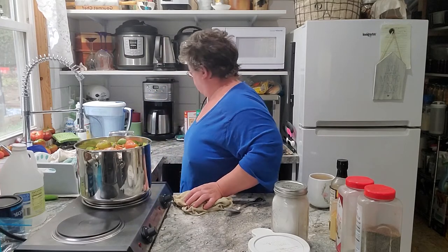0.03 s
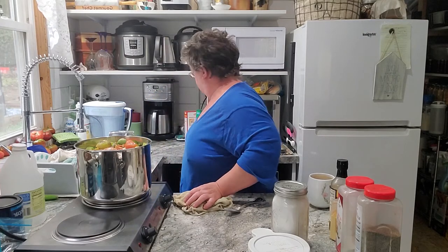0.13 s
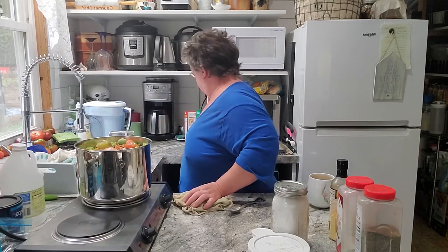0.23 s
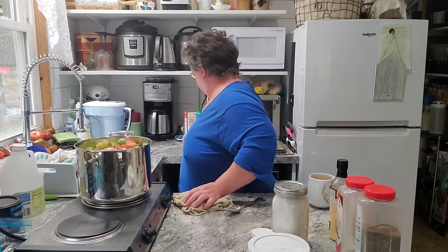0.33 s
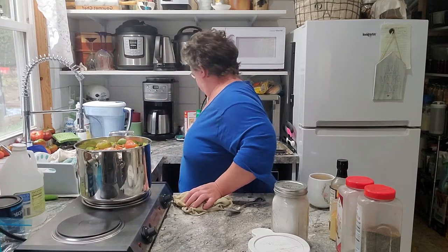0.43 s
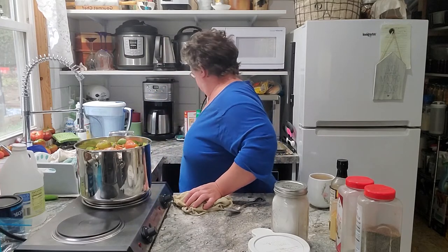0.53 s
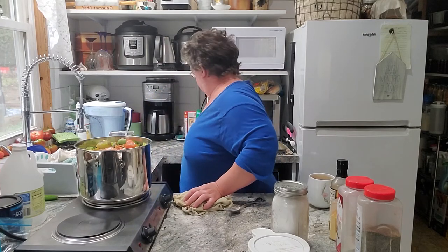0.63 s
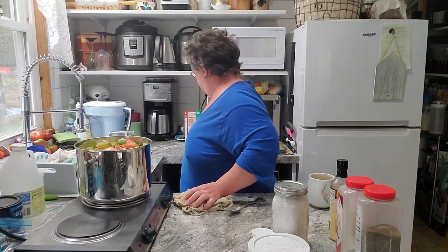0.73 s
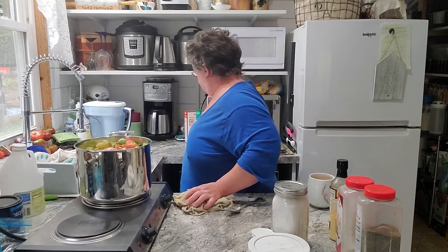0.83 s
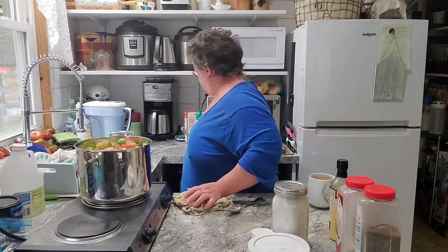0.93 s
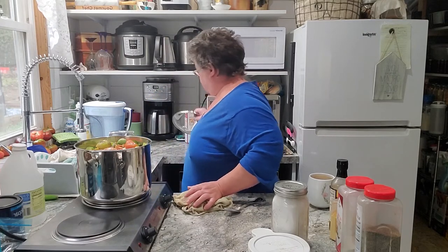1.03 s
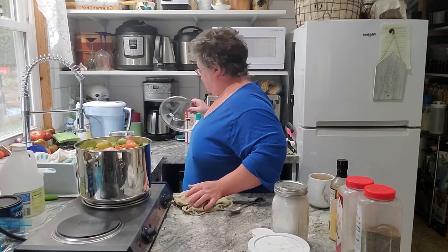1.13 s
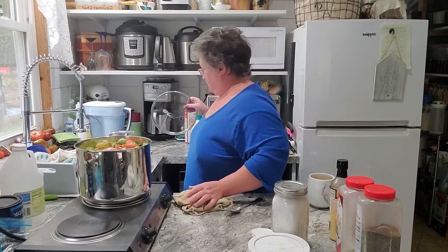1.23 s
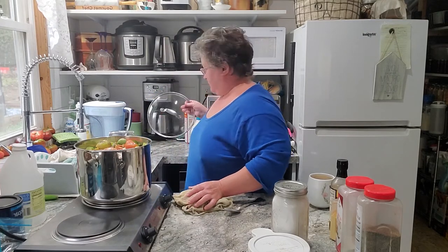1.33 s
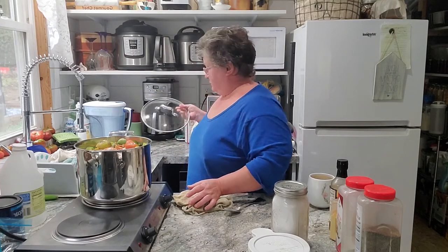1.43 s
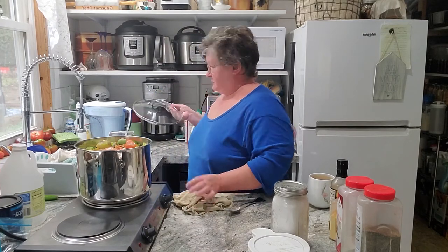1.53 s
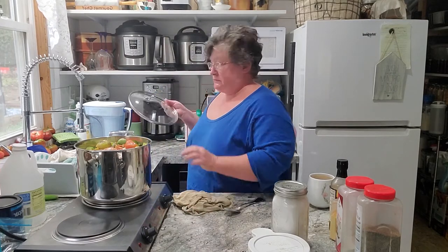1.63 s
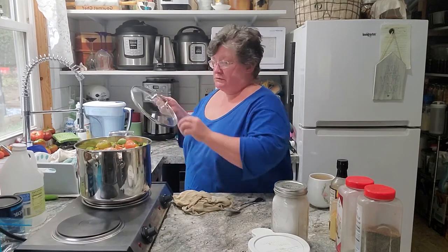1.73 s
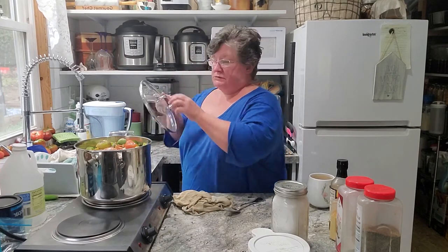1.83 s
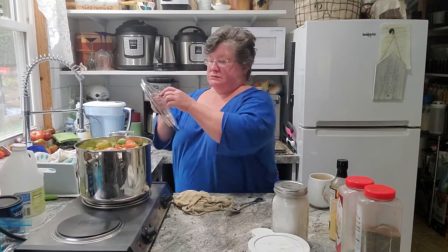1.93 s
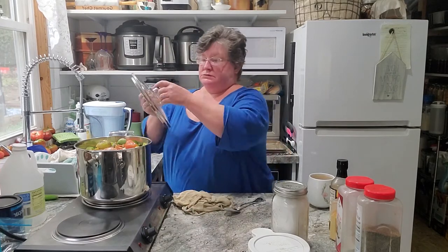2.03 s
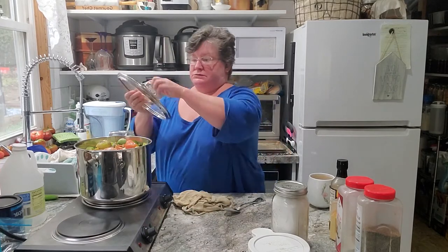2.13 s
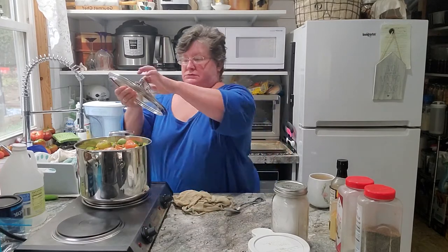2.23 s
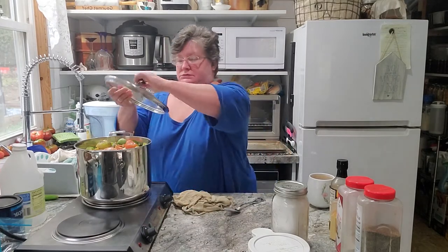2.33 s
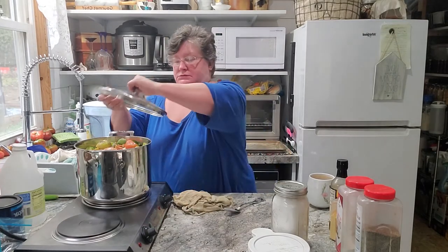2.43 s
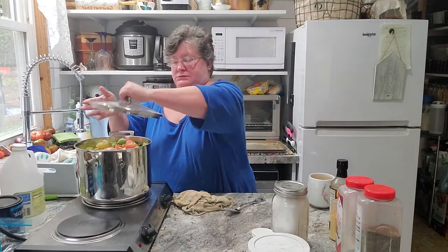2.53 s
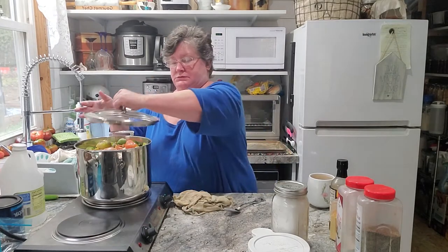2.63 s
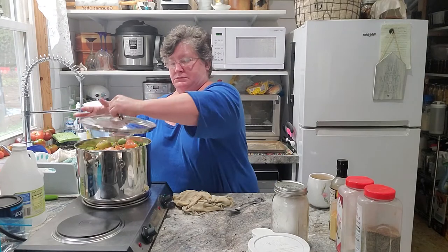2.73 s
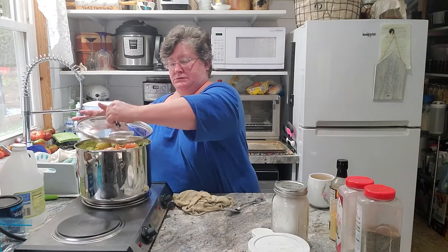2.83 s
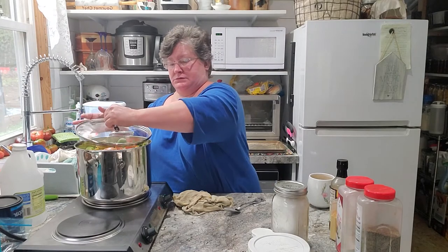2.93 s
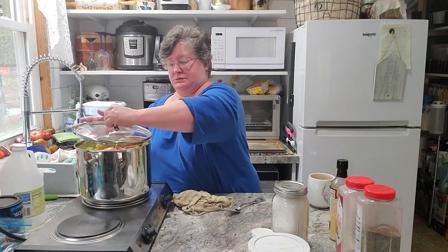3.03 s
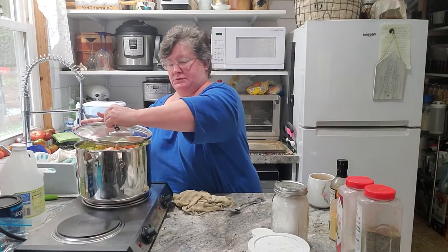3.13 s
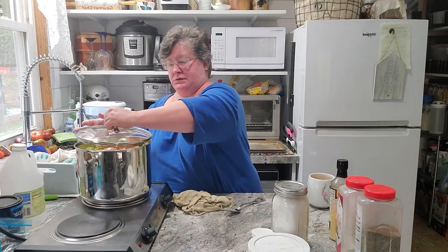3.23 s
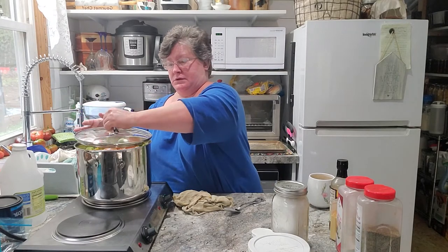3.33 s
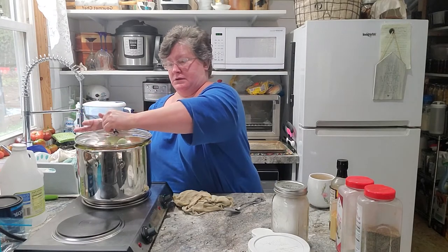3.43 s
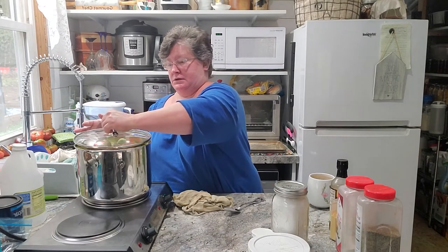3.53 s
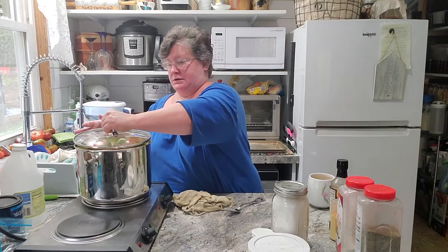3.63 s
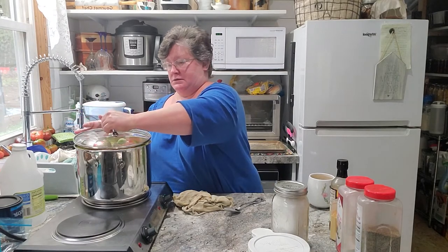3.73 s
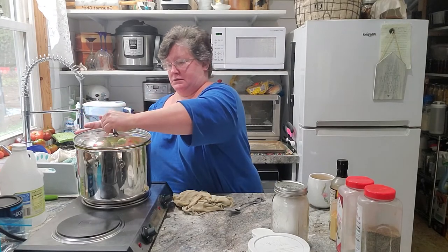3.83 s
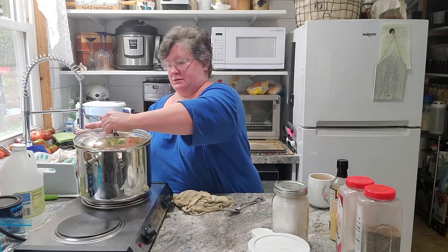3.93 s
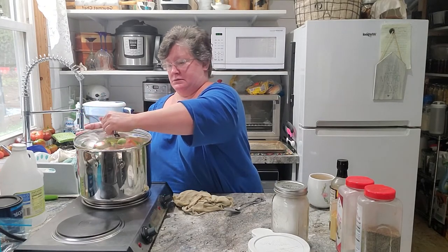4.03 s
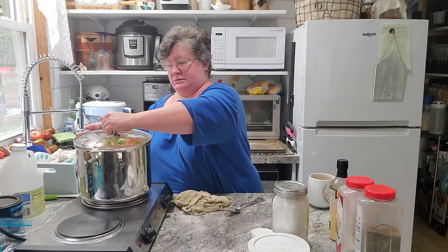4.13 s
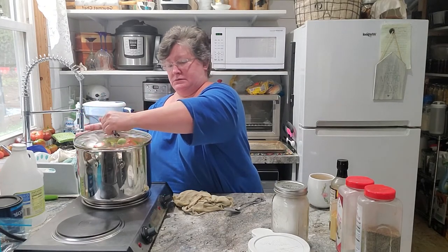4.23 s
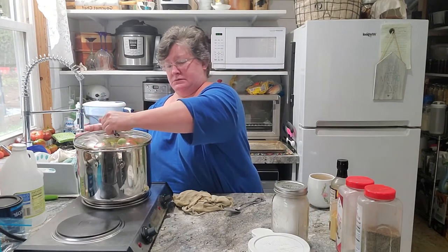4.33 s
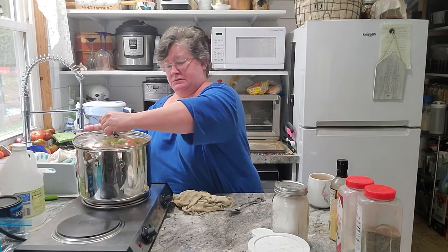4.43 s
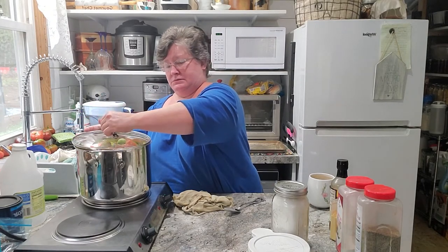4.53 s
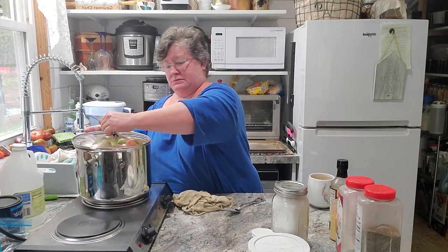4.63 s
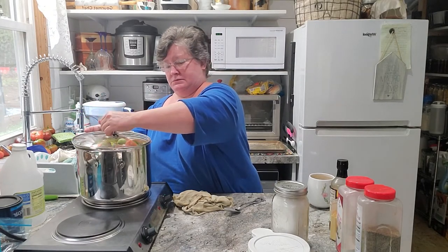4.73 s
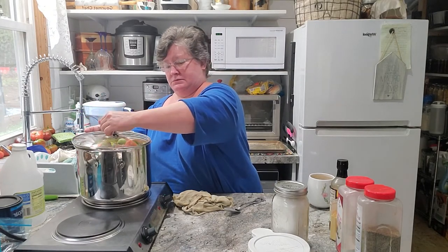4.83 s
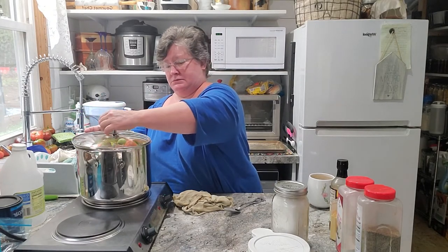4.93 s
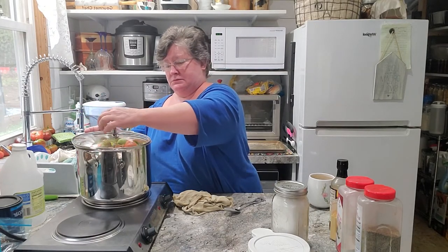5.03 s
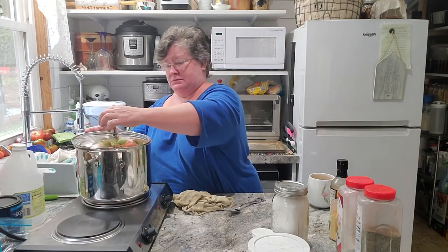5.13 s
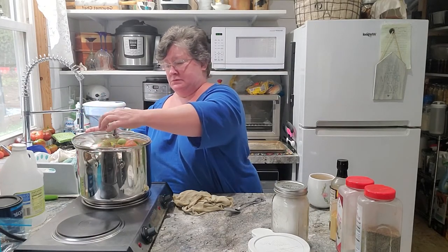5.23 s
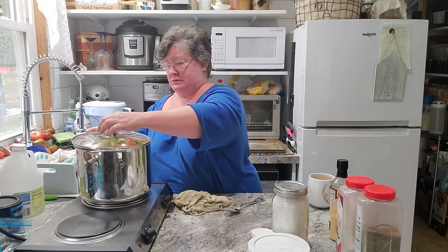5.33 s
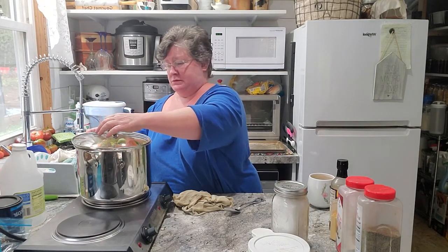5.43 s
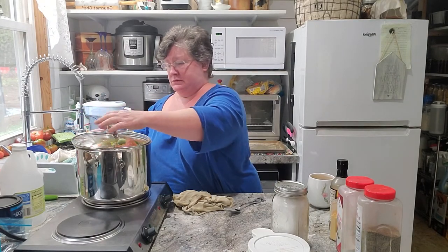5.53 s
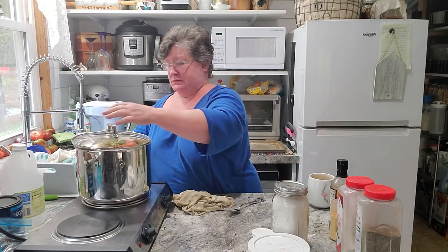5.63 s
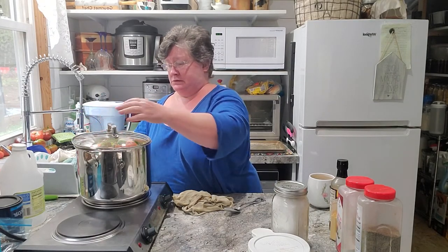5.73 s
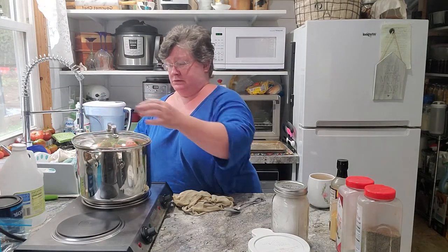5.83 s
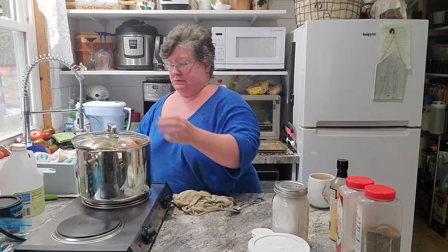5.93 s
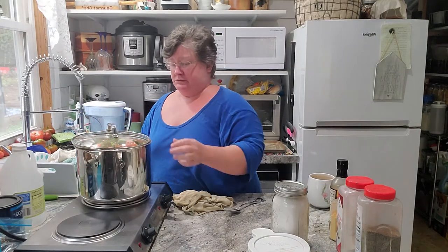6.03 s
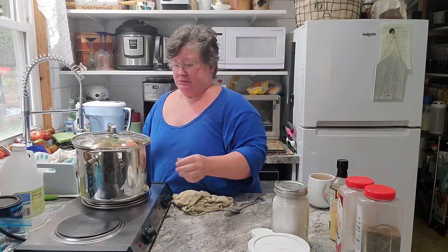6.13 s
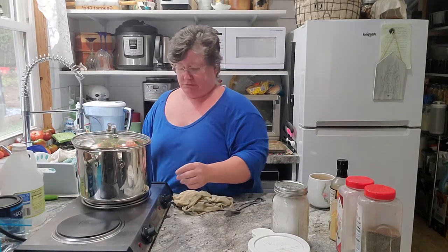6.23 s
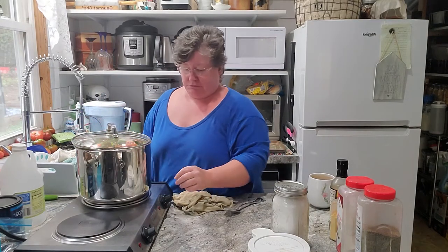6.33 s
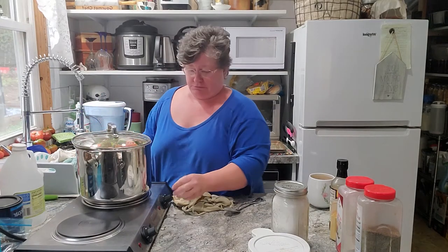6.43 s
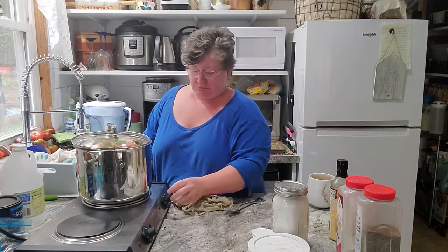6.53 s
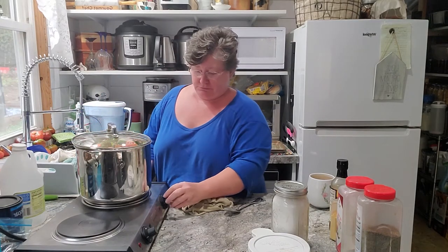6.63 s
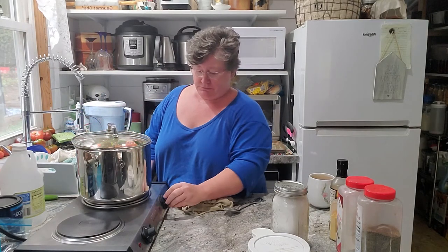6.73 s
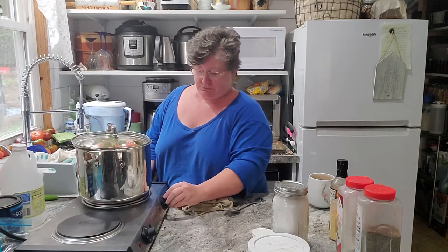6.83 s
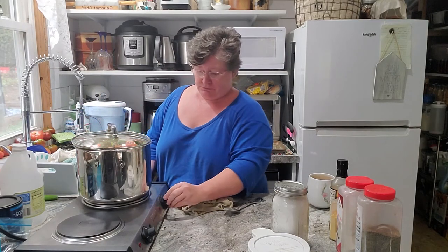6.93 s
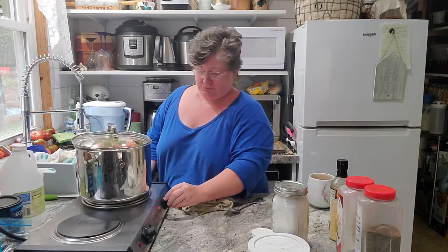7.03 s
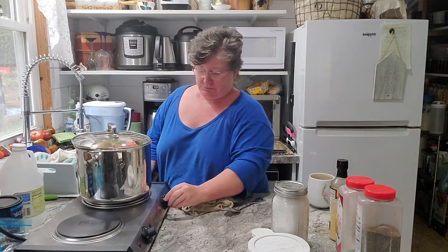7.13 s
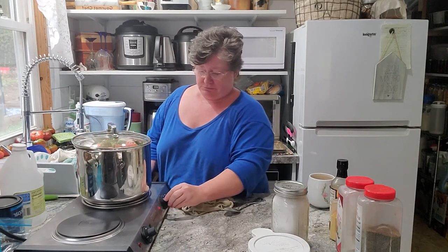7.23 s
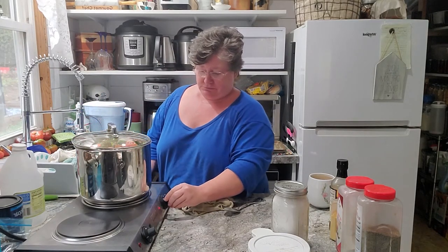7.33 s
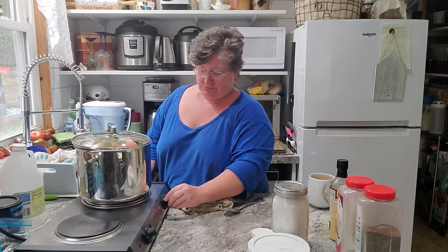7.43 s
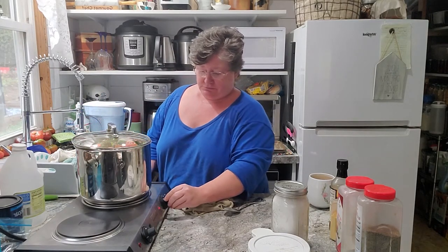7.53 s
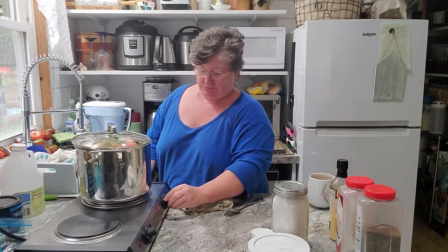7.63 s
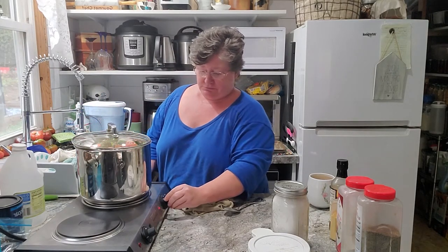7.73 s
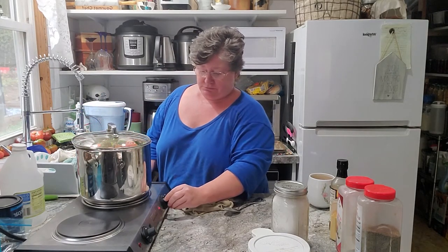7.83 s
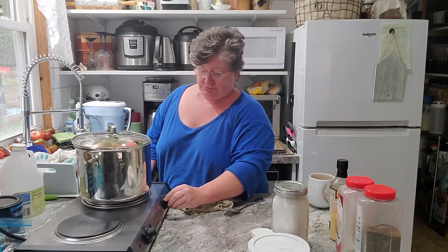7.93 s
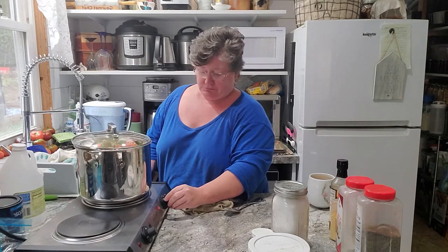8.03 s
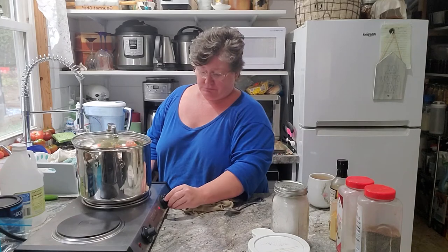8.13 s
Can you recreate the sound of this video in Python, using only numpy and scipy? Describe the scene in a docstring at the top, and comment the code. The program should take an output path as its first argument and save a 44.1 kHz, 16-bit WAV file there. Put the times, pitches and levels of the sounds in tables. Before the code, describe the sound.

A thin metal lid scrapes and clinks, clangs onto a full steel pot, rattles into place, then a stove switch clicks, over a low fan hum.

```python
"""Pot lid, stove switch and fan

A fan hums while a lid is rubbed and tapped, struck on its pot, dropped and pressed down; a switch snaps last.
Contacts are impulses with a dense echo, shaped by a body; metal adds decaying modes.
Rubbing is a run of tiny random contacts; the fan is shaped noise with narrow resonances.
"""
import sys
import numpy as np
from scipy import signal
from scipy.fft import rfft, irfft, next_fast_len
from scipy.io import wavfile

SR = 44100
rng = np.random.default_rng(int(sys.argv[2]) if len(sys.argv) > 2 else 0)


def digitize_waveform(pressure):
    """Quantize a signal to 16-bit integers and store it at the path in sys.argv[1].

    Rows of a 2-D input are taken as channels; values are limited to [-1, 1].
    """
    field = np.atleast_2d(pressure).T
    bounded = np.clip(field, -1, 1)
    quanta = np.round(bounded * 32767).astype(np.int16)
    wavfile.write(sys.argv[1], SR, quanta)


N = 361134
AGE = np.arange(int(.4 * SR)) / SR  # seconds since a contact began
KNEE_HZ, TOP_HZ = 1600, 15850  # hardness tilts the treble between these
ROOM_T60_S, ROOM_HOLD_S, ROOM_RISE_S = 0.23, 0.04, 0.0022


def undb(db):
    """Level law: decibels become an amplitude gain."""
    return 10 ** (np.asarray(db) / 20)


def unit(x):
    """Energy normalisation: scale to a mean energy of one per channel."""
    return x / np.sqrt(np.mean(np.sum(x ** 2, axis=-1)))


def pan(db):
    """Constant-power panning: left and right gains for a left-minus-right difference."""
    gains = undb([db / 2, -db / 2])
    return gains / np.sqrt(np.mean(gains ** 2, axis=0))


def interpolate_spectrum(points, size):
    """Logarithmic frequency scale: (hz, db) points give dB at every bin, straight over log frequency."""
    hz, db = np.transpose(points)
    log_hz = np.log(np.maximum(np.arange(size // 2 + 1) * SR / size, 1))
    return np.interp(log_hz, np.log(hz), db)


def colour(x, points):
    """Minimum-phase filtering: folding the cepstrum makes a response through (hz, db) points causal."""
    size = next_fast_len(x.shape[-1] // 2 + SR // 20) * 2
    cepstrum = irfft(np.log(undb(interpolate_spectrum(points, size))))
    cepstrum[1:size // 2] *= 2
    cepstrum[size // 2 + 1:] = 0
    response = np.exp(rfft(cepstrum))
    return irfft(rfft(x, size) * response)[..., :x.shape[-1]]


def lean(x, points):
    """Frequency-dependent panning: left-right balance by band, at the same power."""
    size = next_fast_len(x.shape[1] + SR // 10)
    gains = pan(interpolate_spectrum(points, size))
    return irfft(rfft(x, size) * gains, size)[:, :x.shape[1]]


def diffuse(size, apart_hz=800, bass_side=0.11):
    """Diffuse-field coherence: long waves reach both microphones alike, short ones unrelated."""
    mid, side = rfft(rng.standard_normal((2, size)))
    hz = np.arange(len(mid)) * SR / size
    side = side * np.minimum(np.hypot(bass_side, hz / apart_hz), 1)
    return irfft(np.array([mid + side, mid - side]), size) / np.sqrt(2)


def add(out, start_s, x):
    """Superposition: mix x into out from start_s on."""
    i = int(start_s * SR)
    out[:, i:i + x.shape[1]] += x[:, :N - i]


# fan air noise and hiss, relative spectrum: hz [Hz], density_db [dB per Hz]
AIR = [(25, -20.5), (100, -8.5), (200, -5.5), (300, 3.5), (480, -1), (900, -12.5), (1250, -24), (2050, -27),
       (2600, -33), (3300, -28), (4200, -38), (7800, -43), (11500, -36.5), (15800, -35)]
# lean of the air noise: hz [Hz], left_minus_right_db [dB]
AIR_LEAN = [(60, -29), (110, -2), (200, -3.5), (380, -3.5), (700, -4), (1290, -10.5), (2380, 4.5),
            (4400, 3), (8120, -6.5), (15000, 0)]
# narrow resonances that the fan keeps humming:
# centre_hz [Hz], half_width_hz [Hz, to half amplitude], rms_db [dB, before swell and pan]
HUM = [(57.6, 3.5, -58.5), (149, 15, -60.5), (163, 4.3, -68), (235.2, 8.3, -57), (273, 17.3, -49.5),
       (303.4, 15.3, -49), (336.7, 3, -55), (410, 2.4, -71), (524.4, 7.6, -60.5), (851.6, 10.4, -66.5),
       (1987, 87, -76), (2135, 19, -78.5), (5730, 5.4, -93), (11500, 270, -80.5)]
# the hum wavers slowly: time_s [s], gain_db [dB]
HUM_SWELL = [(0, 1.5), (1.6, -2), (2.452, 3), (3.1, 0), (4.9, 1.5), (6.9, 0), (8.1, 2.5)]


def fan(air_db=-47, hum_pan_db=-6):
    """Resonant filtering of noise: narrow bands hum and waver, standing to the right, over steady air noise."""
    hz = np.arange(N // 2 + 1) * SR / N
    power = np.zeros(len(hz))
    for centre_hz, half_width_hz, rms_db in HUM:
        resonance = unit(1 / (1 + ((hz - centre_hz) / half_width_hz) ** 2))
        power += undb(rms_db) ** 2 * resonance ** 2
    hum = unit(irfft(rfft(diffuse(N)) * np.sqrt(power), N)) * np.sqrt(N * power.sum())
    air = unit(colour(diffuse(N), AIR)) * np.sqrt(N) * undb(air_db)
    swell = undb(np.interp(np.arange(N) / SR, *np.transpose(HUM_SWELL)))
    return swell * hum * pan(hum_pan_db)[:, None] + lean(air, AIR_LEAN)


def fade(t60_s, hold_s):
    """Reverberant decay: sound caught between cupboards and walls holds briefly, then dies away."""
    return undb(-60 * (np.hypot(AGE, hold_s) - hold_s) / t60_s)


# the straight path carries the middle; bass and treble come mostly by way of the walls:
# hz [Hz], gain_db [dB]
DIRECT_PATH = [(110, -30.5), (280, 1), (480, 0.5), (900, 1), (1500, -10.5), (3500, -18.5)]
# how the room leans at the microphones: hz [Hz], left_minus_right_db [dB]
ROOM_LEAN = [(60, -3), (110, -9), (200, 0), (400, -7), (580, 1), (800, -6.5), (1290, -2.5), (2380, -1.5),
             (4400, -3.5), (8100, -19), (12000, 0), (15000, -5)]


def crack(body, direct_db, hold_s=ROOM_HOLD_S, bass_hz=150, bass_t60_s=0.33, bass_rise_s=0.016, bass_db=2):
    """Impulse response: direct sound and dense echo, coloured by the body; bass comes late and stays."""
    direct = undb(direct_db) * colour(signal.unit_impulse(len(AGE)), DIRECT_PATH)
    echo_rise = 1 - np.exp(-AGE / ROOM_RISE_S)
    echo = unit(diffuse(len(AGE)) * fade(ROOM_T60_S, hold_s) * echo_rise)
    bass_rise = 1 - np.exp(-AGE / bass_rise_s)
    boom = unit(diffuse(len(AGE)) * fade(bass_t60_s, hold_s) * bass_rise)
    echo = signal.sosfilt(signal.butter(2, bass_hz, "high", fs=SR, output="sos"), echo)
    boom = signal.sosfilt(signal.butter(2, bass_hz, "low", fs=SR, output="sos"), boom)
    arriving = lean(direct + echo + undb(bass_db) * boom, ROOM_LEAN)
    return unit(colour(arriving, body))


def ring(hz, db, pan_db, hold_s=ROOM_HOLD_S, t60_s=0.23, apart_hz=1100, build_s=0.0025,
         attack_s=0.0019, damping=0.04, split=0.0106, twin_db=-4):
    """Modal decay: higher modes build up in the room, arrive out of step and die sooner."""
    hz, db = hz[:, None], db[:, None]
    scattered = np.minimum(hz / apart_hz, 1) ** 2
    chance = rng.uniform(-1.025, 1, (len(hz), 5)).T[:, :, None]
    main = np.sin(2 * np.pi * hz * AGE + np.pi * chance[:2] * scattered)
    # nothing is quite round, so each high mode has a close twin that beats against it
    twin_hz = hz * (1 + split * chance[2])
    twin = np.sin(2 * np.pi * twin_hz * AGE + np.pi * chance[3:])
    build = (1 - scattered * np.exp(-AGE / build_s)) * (1 - np.exp(-AGE / attack_s))
    decay = fade(t60_s * (apart_hz / hz) ** damping, hold_s)
    modes = undb(db) * build * decay * (main + undb(twin_db) * scattered * twin)
    return unit(np.sum(modes * pan(pan_db).reshape(2, -1, 1), axis=1))


def contact(x, level_db, hardness_db, length_s=1 / 15):
    """Contact stiffness: soft loses treble, hard gains it; force sets the mean level over length_s."""
    octaves = np.log2(TOP_HZ / KNEE_HZ)
    x = colour(x, [(KNEE_HZ, 0), (TOP_HZ, hardness_db * octaves)])
    return unit(x) * np.sqrt(length_s * SR) * undb(level_db)


# the stove switch trips, then its spring snaps home:
# start_s [s], level_db [dB], hardness_db [dB per octave], ring_db [dB re crack, before hardness]
SWITCH = [(7.0063, -38.5, 5, -20), (7.0405, -38.5, -0.5, 1)]
# modes of the switch: pitch_hz [Hz], level_db [dB, relative]
SWITCH_MODES = [(2108, -11), (3085, -2.5), (3350, -7), (4800, -15), (12600, -3), (12850, -6), (13900, 1)]
# dense resonances of the switch: hz [Hz], gain_db [dB, relative]
SWITCH_COLOUR = [(50, -23), (400, -3), (1400, -8), (3000, -7), (5800, -9.5), (8200, -22.5), (11000, -16),
                 (13800, -18), (16000, -21.5)]


def switch(direct_db=0):
    """Impulsive excitation of modes: the switch snaps twice and its spring rings."""
    out = np.zeros((2, N))
    for start_s, level_db, hardness_db, ring_db in SWITCH:
        spring = ring(*np.transpose(SWITCH_MODES), pan_db=-2, hold_s=0.012, t60_s=0.24)
        snap = crack(SWITCH_COLOUR, direct_db, hold_s=0.0089) + undb(ring_db) * spring
        add(out, start_s, contact(snap, level_db, hardness_db))
    return out


# dull bumps on shelf and counter: start_s [s], level_db [dB], hardness_db [dB per octave]
BUMPS = [(0.7624, -33.5, 6), (6.257, -32, 3)]
# dense resonances of shelf and counter: hz [Hz], gain_db [dB, relative]
BUMP_COLOUR = [(25, -47), (130, 0), (280, 14), (800, 7.5), (1400, -4), (2700, -18.5), (4400, -43),
               (8000, -45), (16000, -55)]


def bumps(direct_db=-6):
    """Heavily damped impact: shelf and counter thud without ringing modes."""
    out = np.zeros((2, N))
    for start_s, level_db, hardness_db in BUMPS:
        add(out, start_s, contact(crack(BUMP_COLOUR, direct_db), level_db, hardness_db))
    return out


# modes of the lid held free: pitch_hz [Hz], level_db [dB, relative]
LID_MODES = [(1980, 5.5), (2305, 2), (2560, -5), (2990, 3), (3480, 6), (3790, 2), (4055, 7.5), (4530, 5),
             (5110, 6), (5260, 1), (5720, -1.5), (6130, 3), (6950, -7), (7370, 0), (9350, -12), (9880, -10)]


def lid_ring(pan_db=-5):
    """Free plate vibration: the unsupported lid rings high and thin."""
    return ring(*np.transpose(LID_MODES), pan_db)


# the lifted lid, touched by shelf and fingers:
# start_s [s], level_db [dB], hardness_db [dB per octave], ring_db [dB re crack, before hardness]
LID_TAPS = [(.849, -31.5, -8.5, -3), (.8665, -49, -2, 4), (1.7102, -55.5, -10, -8), (1.897, -36, 2, -2),
            (2.187, -52, -5, 4.5), (2.292, -44, 0.5, -12)]
# dense resonances of the free lid: hz [Hz], gain_db [dB, relative]
LID_COLOUR = [(50, -24), (300, -1), (750, -1.5), (1400, -9), (3000, -7), (5200, -7), (7300, -13),
              (8500, -18), (11500, -19), (16000, -25)]


def lid_taps(direct_db=-8):
    """Impulsive excitation of a plate: the lifted lid clinks and rings at each touch."""
    out = np.zeros((2, N))
    for start_s, level_db, hardness_db, ring_db in LID_TAPS:
        clink = crack(LID_COLOUR, direct_db) + undb(ring_db) * lid_ring()
        add(out, start_s, contact(clink, level_db, hardness_db))
    return out


# dense resonances of lid and pot: hz [Hz], loose_db [dB, relative], pressed_down_db [dB, relative]
POT_COLOUR = [(22, -55, -42), (58.7, -3, 5.5), (112, -26.5, -15), (201, -8, -5), (314, 0, 9.5),
              (490, 6, -15), (735, -11, 1.5), (1150, -21, -6), (2270, -24.5, -14.5), (2830, -17.5, -17),
              (4700, -21.5, -27), (7470, -29, -24), (8500, -33.5, -36), (11600, -25.5, -32.5),
              (15700, -35, -36)]


def pot_body(seating):
    """Boundary conditions: pressing the lid down shifts the dense resonances of lid and pot."""
    return [(hz, np.interp(seating, [.5, 1], db)) for hz, *db in POT_COLOUR]


# rubbing of fingers on the lid, along a shelf or counter board, or of the lid on the pot:
# start_s [s], length_s [s], level_db [dB], hardness_db [dB per octave], surface [name]
SLIDES = [(0.096, 0.043, -42.5, -0.5, "fingers"), (.764, 0.076, -31.5, -5, "board"),
          (.825, 0.035, -22.5, -3.5, "board"), (2.11, 0.1, -55, 0.5, "fingers"),
          (2.358, 0.13, -58, 3, "fingers"), (3.925, 0.22, -46, -1, "pot"), (4.263, 0.078, -52, 0, "pot"),
          (4.382, 0.072, -32, -2.5, "pot"), (4.599, 0.059, -43.5, -1, "pot"),
          (6.494, 0.021, -44.5, -17, "board")]
# dry hiss of fingers on the lid: hz [Hz], gain_db [dB, relative]
FINGER_COLOUR = [(50, -15), (450, 1), (1000, -3.5), (2000, -6), (4000, -13.5), (8500, -18), (13000, -14.5),
                 (16000, -22)]
# dense resonances of the rubbed board: hz [Hz], gain_db [dB, relative]
BOARD_COLOUR = [(25, -16), (110, -19.5), (240, 9.5), (400, -7), (550, 7.5), (950, -9.5), (1350, -5),
                (2900, -19), (4300, -25), (6300, -25.5), (8500, -29), (12000, -23), (16000, -27)]


def slides(catches_per_s=700, uneven_db=4, ring_db=-17, direct_db=-6, seating=0.63):
    """Stick-slip friction: the sliding contact catches in tiny uneven blows that swell and ebb."""
    out = np.zeros((2, N))
    bodies = {"fingers": FINGER_COLOUR, "board": BOARD_COLOUR, "pot": pot_body(seating)}
    for start_s, length_s, level_db, hardness_db, surface in SLIDES:
        pressure = np.sin(np.pi * np.minimum(AGE / length_s, 1))
        catches = (rng.random(len(AGE)) < catches_per_s / SR) * pressure
        catches *= undb(uneven_db * rng.standard_normal(len(AGE)))
        catches *= rng.choice([-1, 1], len(AGE))
        one_catch = crack(bodies[surface], direct_db) + undb(ring_db) * lid_ring()
        scrape = signal.fftconvolve(one_catch, catches[None], axes=1)[:, :len(AGE)]
        add(out, start_s, contact(scrape, level_db, hardness_db, length_s))
    return out


# lid on pot: start_s [s], level_db [dB], hardness_db [dB per octave],
# seating [0 on its edge, .5 dropped flat, 1 pressed down], ring_db [dB re crack, before hardness], sustain_s [s]
BLOWS = [(3.2342, -16, 0, 0, 4, 0.062), (3.4185, -34.5, -8, 1, -1, .005), (3.434, -13, 0.5, .56, -3, 0.04),
         (4.0136, -28, 1, 0.91, 1.5, 0.039), (4.342, -22, -5.5, 0.95, -3, 0.022),
         (4.459, -23, -0.3, 0.89, 0.5, 0.0069), (4.574, -42, -1.5, 0.86, -7, .005)]
# modes of lid and pot: pitch_hz [Hz], on_edge_db, dropped_flat_db, pressed_down_db [dB, relative],
# left_minus_right_db [dB]
POT_MODES = [(243, -23, -12, -6, -1), (275, -7, -6, -2, -6), (305, -15, -4, 0, -4), (371, -7, -2, -1, -6),
             (396, -18, -12, 2, -5), (435, -4, -2, -11, -2), (458, 0, -2, -9, -7), (492, -12, 0, -15, -3),
             (545, -12, -9, -13, 5), (626, -19, -9, -7, -2), (680, -27, -15, -5, 2),
             (803, -23, -15, -6, -3), (1044, -32, -17, -21, -10), (1185, -36, -27, -8, -8),
             (1225, -38, -27, -9, -6), (1380, -41, -21, -24, -10), (1577, -37, -29, -24, -5),
             (1930, -40, -30, -17, -5), (2457, -22, -27, -33, -11), (2691, -20, -20, -30, -7),
             (2860, -36, -23, -29, -7), (3021, -33, -20, -30, 1), (3120, -26, -23, -28, -4),
             (3412, -39, -22, -35, -7), (3780, -34, -23, -31, -5), (4070, -44, -23, -29, 2),
             (4289, -32, -25, -34, -7), (4470, -33, -25, -37, -5), (4600, -31, -22, -36, -6),
             (5566, -41, -27, -36, -11)]
# sound straight from the rim: on_edge_db, dropped_flat_db, pressed_down_db [dB]
SEATED_DIRECT_DB = [-5.5, -1, -1]


def clanks():
    """Coupled vibration: how well the lid is seated on the pot decides which modes answer."""
    out = np.zeros((2, N))
    modes = np.array(POT_MODES, float)
    for start_s, level_db, hardness_db, seating, ring_db, sustain_s in BLOWS:
        def seated(values):
            """Interpolation between the three states of support."""
            return np.interp(seating, [0, .5, 1], values)

        mode_db = np.array([seated(row) for row in modes[:, 1:-1]])
        tone = ring(modes[:, 0], mode_db, modes[:, -1], sustain_s)
        blow = crack(pot_body(seating), seated(SEATED_DIRECT_DB), sustain_s) + undb(ring_db) * tone
        add(out, start_s, contact(blow, level_db, hardness_db))
    return out


def scene():
    """Superposition: lid, pot and small contacts sound over the fan."""
    return fan() + switch() + bumps() + lid_taps() + slides() + clanks()


def record(dry):
    """Band limitation: an elliptic low-pass cuts the top steeply."""
    return signal.sosfilt(signal.ellip(10, .2, 70, TOP_HZ, fs=SR, output="sos"), dry)


dry = scene()
out = record(dry)
digitize_waveform(out)
```